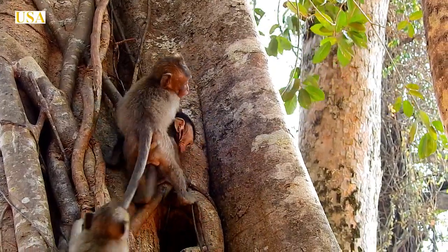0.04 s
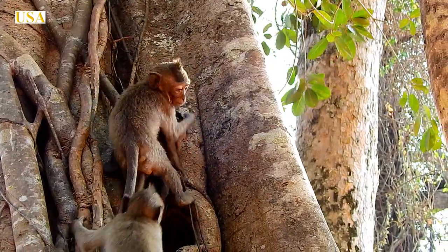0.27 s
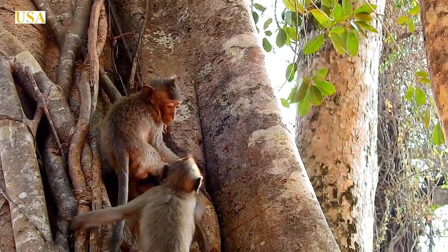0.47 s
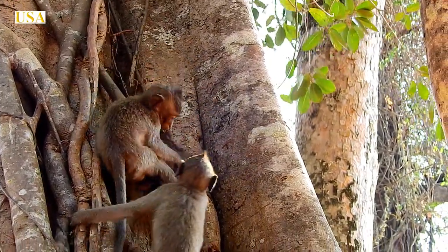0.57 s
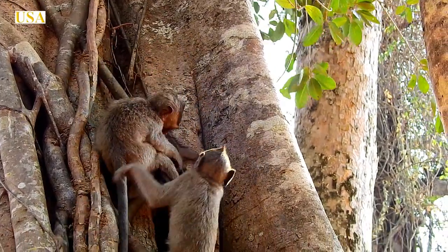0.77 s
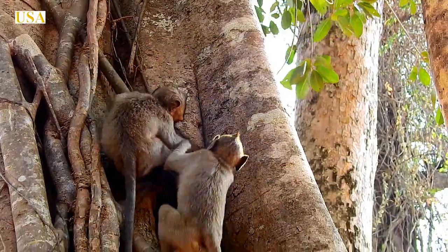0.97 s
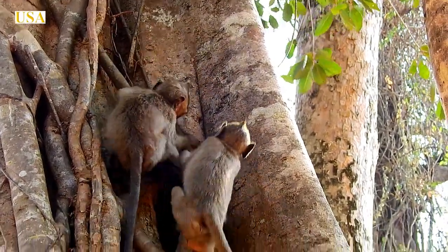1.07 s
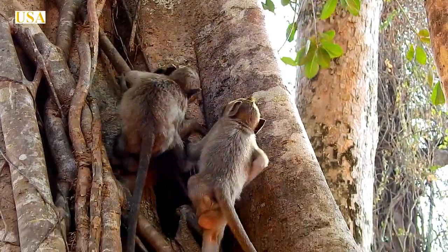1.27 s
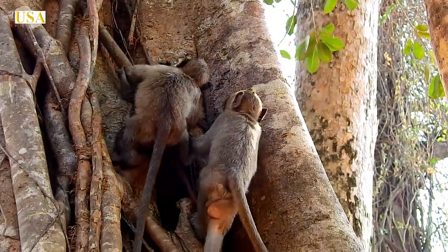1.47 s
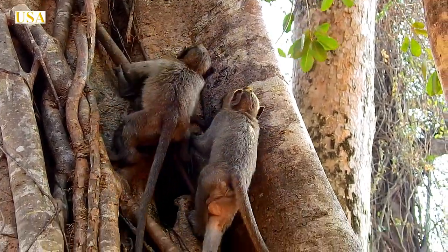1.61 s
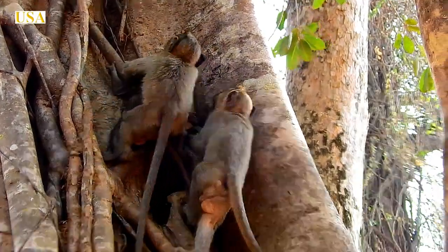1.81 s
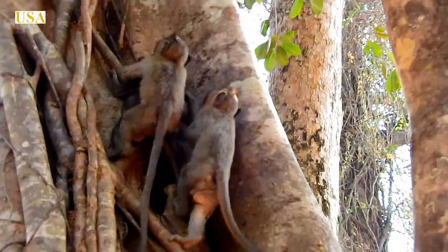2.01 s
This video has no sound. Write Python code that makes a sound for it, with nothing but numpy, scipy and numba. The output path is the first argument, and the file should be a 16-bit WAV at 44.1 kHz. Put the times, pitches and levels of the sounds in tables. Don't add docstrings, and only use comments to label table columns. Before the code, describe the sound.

A young monkey a few metres away gives three short, very high, rough screams, the last weaker; trunks scatter brief echoes over soft forest air and a far low motor drone, with faint claw scrapes at the end.

```python
import sys
import numpy as np
from scipy import signal
from scipy.fft import rfft, irfft
from scipy.io import wavfile
from scipy.ndimage import uniform_filter1d, map_coordinates
from numba import njit

SR = 44100
rng = np.random.default_rng(int(sys.argv[2]) if len(sys.argv) > 2 else 0)


def wav_out(sig):
    wavfile.write(sys.argv[1], SR, np.round(np.clip(np.atleast_2d(sig).T, -1, 1) * 32767).astype(np.int16))


def field_ratio(decibels):
    return 10 ** (np.asarray(decibels, dtype=float) / 20)


N = 90404

# (frequency [Hz], level [dB per Hz])
AIR_SPECTRUM = [(25, -49), (62, -1), (165, -4), (250, -11.5), (700, -21), (1200, -18), (3800, -18),
                (8500, -44)]
# (frequency [Hz], side minus mid [dB])
AIR_WIDTH = [(30, -1), (125, -6), (250, -21), (600, -14), (3000, -16), (8000, -5)]
# (time [s], level [dB])
BREEZE = [
    (0, 0),
    (.3, 3.5),
    (.7, -5.5),
    (.95, 4.5),
    (1.15, -1.5),
    (1.45, -13),
    (1.7, 2),
    (2.05, -2.5),
]
# (start [s], length [s], level [dB], body centre [Hz], hiss [dB])
SCRAPES = [
    (1.813, 0.05, -53, 810, -5),
    (1.921, 0.034, -50, 1000, -5),
    (1.932, 0.043, -70, 2690, 16.5),
    (1.971, 0.012, -65, 3000, 10),
    (1.981, 0.056, -60, 1290, 3.5),
    (1.996, 0.01, -70.5, 3000, 13.5),
    (2.005, 0.032, -73, 2580, 12.5),
]
# (frequency [Hz], gain [dB])
CLAW_HISS = [(1500, -1), (5000, 1), (8000, 3.5), (9500, -15), (13000, -16), (15500, -40)]
# (frequency [Hz], gain [dB])
VOICE_WIDTH = [(3000, -23.5), (5000, -29), (8000, -4), (14000, -7.5)]
# (start [s], length [s], from [Hz], to [Hz], level [dB])
CROAKS = [
    (1.001, 0.049, 3610, 3870, -39.5),
    (1.011, 0.0327, 2820, 2530, -39.5),
    (1.02, 0.051, 3900, 3200, -36.5),
]
# (start [s], length [s], from [Hz], to [Hz], level [dB])
WHISTLES = [
    (0.187, 0.031, 3750, 3780, -49),
    (.259, 0.019, 6880, 6200, -19),
    (0.274, 0.023, 6260, 5540, -26),
    (1.462, 0.028, 5050, 5500, -46.5),
    (1.763, 0.025, 5640, 5730, -32),
    (1.786, 0.025, 5420, 3975, -30.5),
    (1.755, .035, 7650, 7520, -43),
]
# (start [s], length [s], from [Hz],
# to [Hz], level [dB])
STRANDS = [(.201, 0.016, 6200, 6450, -27), (0.222, 0.018, 6300, 6675, -21), (0.291, 0.011, 6540, 6800, -22),
           (0.294, 0.013, 4420, 4500, -34), (0.313, .02, 6500, 6490, -26), (0.373, 0.013, 6900, 7400, -24),
           (0.373, 0.016, 4750, 4580, -29), (0.39, 0.0067, 4350, 4280, -36), (.385, 0.012, 6330, 6050, -25),
           (0.429, 0.027, 6500, 6600, -27), (0.436, .05, 5792, 5540, -24.5),
           (0.802, 0.017, 6600, 6370, -33), (.809, 0.014, 6400, 6660, -25.5),
           (0.814, .027, 8300, 7400, -34), (.842, 0.013, 6890, 6200, -26),
           (0.841, 0.0088, 4800, 4440, -24.5), (.857, .013, 6280, 6200, -32),
           (0.887, .016, 6400, 6610, -29), (0.913, 0.02, 4300, 4500, -35.5),
           (0.916, 0.031, 6700, 6170, -36), (0.946, 0.03, 4530, 4465, -27.5),
           (0.952, 0.025, 6466, 6480, -30), (0.985, 0.026, 6495, 6484, -28.5),
           (1.016, 0.0074, 7300, 7000, -33), (1.021, 0.018, 4920, 4470, -33),
           (1.037, 0.028, 4600, 4420, -27.5), (1.057, 0.017, 4310, 4260, -31),
           (1.058, 0.013, 7350, 7640, -35.5), (1.027, .036, 3637, 3100, -35),
           (1.48, 0.026, 5450, 5370, -33), (1.49, 0.084, 5390, 5280, -56.5), (1.75, 0.012, 7730, 7200, -36),
           (1.764, .01, 5950, 5780, -35), (1.818, 0.036, 5720, 5690, -52), (1.573, 0.019, 6750, 6700, -31),
           (1.611, 0.051, 6350, 6250, -31), (1.684, 0.031, 10100, 9800, -47.5),
           (1.468, .07, 10850, 10700, -72), (1.086, 0.0676, 4500, 4450, -43),
           (1.152, 0.079, 4450, 4400, -56.5)]
# (time [s], upper resonance level [dB], lower resonance relative [dB],
# rasp relative [dB], upper resonance [Hz])
THROAT_1 = [(0.203, -21, -31, -19.5, 5800), (0.229, -24.5, -47, -41, 6170), (0.245, -22.5, -54, -26, 6700),
            (0.271, -32.5, -32, -24, 6700), (0.297, -21.5, -20.5, -19.5, 6600),
            (0.343, -22.5, -27, -20, 6200), (0.383, -24, -4.5, -12.5, 6470), (0.477, -27, -4, -21.5, 6180),
            (0.488, -40, -4, -10, 6100)]
THROAT_2 = [(0.796, -24.5, -9.5, -24, 6230), (0.802, -21.5, -55, -45, 5530), (0.812, -24, -4, -19, 5900),
            (0.838, -30.5, -12.5, -17.5, 7200), (0.852, -25.5, -10, -23.5, 6250),
            (0.92, -26, -3, -14.5, 6400), (1.004, -25.5, -8, -11.5, 6630), (1.032, -29.5, 5.5, -19.5, 7370),
            (1.085, -43.5, 2, -11.5, 7020)]
THROAT_3 = [(1.558, -33, -18, -21, 6660), (1.578, -30.5, -8, -15, 6900), (1.609, -34.5, -10, -8.5, 6600),
            (1.616, -30, -13.5, -19, 6730), (1.65, -27.5, -10.5, -25, 6460),
            (1.704, -40.5, 1.5, -1.5, 6700), (1.759, -33.5, 1.5, -14.5, 6750), (1.771, -36, 8, -8.5, 5550),
            (1.798, -52.5, 2.5, 1.5, 5600)]
# (time [s], pitch [Hz], roughness [0-1])
FOLDS_1 = [(.2, 2050, .45), (.25, 2350, .6), (.29, 2100, .55), (.365, 2200, .75), (.377, 2370, .3),
           (.395, 2100, .45), (.41, 2200, .95), (.44, 2000, .85), (.49, 1900, .75)]
FOLDS_2 = [(.795, 2150, .7), (.815, 2200, .55), (.83, 2600, 1), (.855, 2100, .7), (.88, 2050, 1),
           (.902, 2200, .6), (.93, 2100, 1), (1.005, 2170, .6), (1.06, 2300, .9)]
FOLDS_3 = [(1.571, 2450, .4), (1.574, 2220, .3), (1.595, 2240, .3), (1.598, 2440, .4), (1.612, 2400, .5),
           (1.615, 2120, .4), (1.655, 2150, .3), (1.745, 2170, .6), (1.76, 1900, .6)]
# (frequency [Hz], gain [dB])
MOUTH = [(2000, -5), (3500, -7), (4100, 0), (7500, -2), (8200, -8.5), (10000, -7), (12000, -2), (15500, 2)]
# (frequency [Hz], gain [dB])
TEETH_HISS = [(10500, -32), (12000, -6), (16000, 0)]

SIDES = np.array([[1], [-1]])


def unit(x):
    return x / np.sqrt(np.mean(x ** 2))


@njit
def svf(x, hz, width_hz):
    y, band_state, low_state = np.empty(len(x)), 0., 0.
    for i in range(len(x)):
        g, k = np.tan(np.pi * hz[i] / SR), width_hz[i] / hz[i]
        v = (band_state + g * (x[i] - low_state)) / (1 + g * (g + k))
        band_state = 2 * v - band_state
        low_state += 2 * g * v
        y[i] = k * v
    return y


def band(x, hz, width_hz):
    width_hz = width_hz + np.zeros(len(x))
    for offset in (-0.3, 0.27, -0.36, 0.29):
        x = svf(x, np.clip(hz + offset * width_hz, 20, .45 * SR), width_hz)
    return x


def walk(rate_hz):
    k = int(SR / rate_hz)
    return unit(uniform_filter1d(uniform_filter1d(rng.standard_normal(N), k), k))


def colour(x, points):
    hz = np.arange(len(x) // 2 + 1) * SR / len(x) + 1
    point_hz, point_db = np.array(points).T
    gain = field_ratio(np.interp(np.log(hz), np.log(point_hz), point_db))
    return irfft(rfft(x) * gain, len(x))


def glide(t, start, length, from_hz, to_hz):
    hz = np.interp(t, [start, start + length], [from_hz, to_hz])
    gate = np.clip(np.minimum(t - start, start + length - t) / .004, 0, 1)
    return hz, gate


def patchy(noise):
    out = 0
    for hz in 38.5 * 2 ** np.arange(8):
        out = out + svf(noise, np.full(N, hz), np.full(N, hz / 2)) * field_ratio(1.5 * walk(13.0))
    return out


def air(t):
    drone_hz, drone_top_hz, air_db = 57.1, 630, -49.5
    earlier_db, earlier_t60_s, leaves_db = -48, 0.99, -69.5
    mid, side, old, old_side = rng.standard_normal((4, N))

    low = signal.lfilter(*signal.butter(1, drone_top_hz, fs=SR), mid)
    mid = mid + np.roll(low, int(SR / drone_hz))
    mid = colour(patchy(mid), AIR_SPECTRUM)
    side = colour(colour(1.5 * patchy(side), AIR_SPECTRUM), AIR_WIDTH)
    floor = (mid + SIDES * side) / np.std(mid) * field_ratio(air_db + 0.47 * walk(15))

    high = signal.lfilter(*signal.butter(2, 1000, "high", fs=SR), floor)
    breeze = field_ratio(np.interp(t, *np.array(BREEZE).T))
    floor = floor + high * (breeze - 1)

    def wide(hz, width_hz):
        return unit(band(old, hz, width_hz)) + .6 * SIDES * unit(band(old_side, hz, width_hz))

    earlier = wide(5270, 2430) * field_ratio(earlier_db - 60 * t / earlier_t60_s)
    leaves = wide(6200, 2500) * field_ratio(leaves_db)
    return floor + earlier + leaves


def scrapes(t):
    grit = rng.standard_normal(N) * field_ratio(2 * walk(160))
    hiss, out = unit(colour(grit, CLAW_HISS)), 0
    for start, length, db, hz, hiss_db in SCRAPES:
        u = np.maximum(t - start, 0) / length
        swell = (np.e * 2 * u * np.exp(-2 * u)) ** 2
        body = unit(band(grit, hz, 0.48 * hz))
        out = out + field_ratio(db) * swell * (body + field_ratio(hiss_db) * hiss)
    return out


def forest(x):
    t60_s, treble_t60_s, far_t60_s = 0.21, 0.21, 0.58
    echo_db, far_db, sway, sway_hz = -8, -12, .018, 120
    t = np.arange(SR // 2) / SR
    out = np.zeros((2, N))
    for k in range(6):
        grain = rng.standard_normal(len(t))
        high = signal.lfilter(*signal.butter(2, 8000, "high", fs=SR), grain)
        decay = field_ratio(-60 * t / t60_s) + field_ratio(far_db - 60 * t / far_t60_s)
        tail = (grain - high) * decay + high * field_ratio(-60 * t / treble_t60_s)
        tail = tail * np.minimum(t / 0.002, 1)
        tail = tail / np.sqrt(3 * np.sum(tail ** 2)) * field_ratio(echo_db)
        drift = np.cumsum(sway * walk(sway_hz))
        place = np.arange(N) + drift - uniform_filter1d(drift, SR // 10)
        out[k % 2] += map_coordinates(signal.fftconvolve(x, tail), [place], mode="nearest")
    return out


def croaks(t):
    out, chaos = 0, rng.standard_normal(N)
    for start, length, from_hz, to_hz, db in CROAKS:
        hz, gate = glide(t, start, length, from_hz, to_hz)
        out = out + field_ratio(db) * gate * unit(band(chaos, hz, 420))
    return out


def whistles(t, rows, waver, flutter_db):
    out = 0
    waver = 1 + waver * walk(111.4)
    flutter = field_ratio(flutter_db * np.minimum(walk(260), 1))
    for start, length, from_hz, to_hz, db in rows:
        hz, gate = glide(t, start, length, from_hz, to_hz)
        phase = 2 * np.pi * np.cumsum(hz * waver) / SR
        tone = np.sin(phase) + field_ratio(-44) * np.sin(2 * phase)
        out = out + np.sqrt(2) * field_ratio(db) * gate * tone
    return out * flutter


def even(x):
    return x / np.sqrt(uniform_filter1d(x ** 2, int(0.029 * SR)) + 1e-9)


def ramp(since_s, length_s):
    return np.clip(since_s / length_s + 1, 0, 1)


def scream(t, throat, folds):
    jitter, shimmer_db, breath_db, rasp_breath_db = .1, 3, -2, 8
    lower_hz, lower_width_hz, upper_width_hz = 4890, 950, 1340
    rasp_hz, rasp_width_hz, octave_db, hiss_db = 9500, 2600, -39.5, -48
    attack_s, lead_s, lead_db, release_s = .006, 0.029, -12.5, 0.013
    stutter_db, stutter_hz = 1.8, 260
    throat_s, *throat_tracks = np.array(throat).T
    up_db, low_db, rasp_db, up_hz = (np.interp(t, throat_s, track) for track in throat_tracks)
    folds_s, fold_hz, fold_rough = np.array(folds).T
    hz, rough = np.interp(t, folds_s, fold_hz), np.interp(t, folds_s, fold_rough)

    unsteady = 1 + jitter * rough ** 1.5 * walk(1200) + .015 * walk(150)
    phase = 2 * np.pi * np.cumsum(hz * unsteady) / SR
    breath = rough * 2 * rng.standard_normal(N)
    pulses = sum(np.cos(k * phase) for k in range(3, 6)) * field_ratio(shimmer_db * rough * walk(560))
    source = pulses + field_ratio(breath_db) * breath

    wide = 1 + 0.86 * rough
    upper = even(band(source, up_hz, upper_width_hz * wide))
    lower = even(band(source + np.cos(2 * phase), lower_hz, lower_width_hz * wide))
    octave = unit(band(upper ** 2, 2 * up_hz + 1200, 5000))
    rasp = even(band(pulses + field_ratio(rasp_breath_db) * breath, rasp_hz, rasp_width_hz))

    since_s, left_s = t - throat_s[0], throat_s[-1] - t
    onset = ramp(since_s, attack_s) + field_ratio(lead_db) * ramp(since_s, lead_s)
    gate = onset * ramp(left_s, release_s)
    out = colour(upper + field_ratio(low_db) * lower + field_ratio(rasp_db) * rasp, MOUTH)
    out = out + field_ratio(octave_db) * octave + field_ratio(hiss_db) * colour(rough * breath, TEETH_HISS)
    stutter = stutter_db * np.minimum(walk(stutter_hz), 1)
    return out * field_ratio(up_db + stutter) * gate


def scene():
    bark_s, duck_s, duck_db = 0.001194, 0.017, -2
    t = np.arange(N) / SR
    voice = scream(t, THROAT_1, FOLDS_1) + scream(t, THROAT_2, FOLDS_2) + scream(t, THROAT_3, FOLDS_3)
    voice = voice + whistles(t, WHISTLES, waver=.007, flutter_db=1.6) + croaks(t)
    voice = voice + whistles(t, STRANDS, waver=.013, flutter_db=3.5)
    loud = np.clip(uniform_filter1d(np.abs(voice), int(duck_s * SR)) / 0.017, 0, 1)
    bounce = colour(np.roll(voice, int(bark_s * SR)), VOICE_WIDTH)
    near = voice + SIDES * bounce
    return near + forest(voice) + scrapes(t) + air(t) * field_ratio(duck_db * loud)


def low_pass(x):
    return signal.sosfilt(signal.butter(12, 15750, fs=SR, output="sos"), x)


def record(dry):
    limit = signal.ellip(8, .2, 70, 15750, fs=SR, output="sos")
    mix = signal.sosfilt(limit, dry)
    return low_pass(mix)


dry = scene()
out = record(dry)
wav_out(out)
```